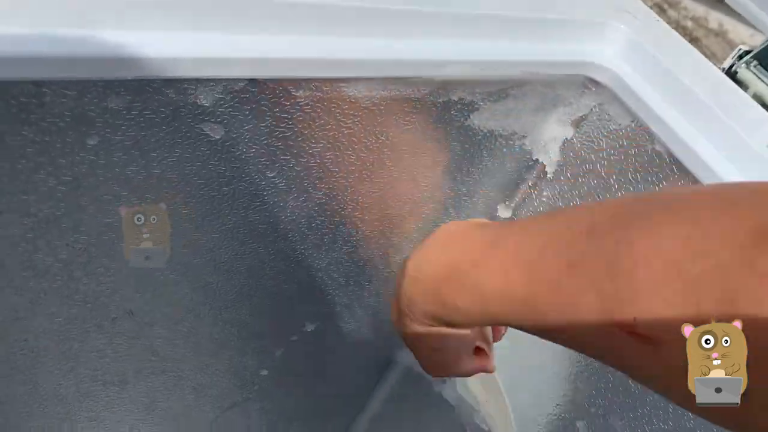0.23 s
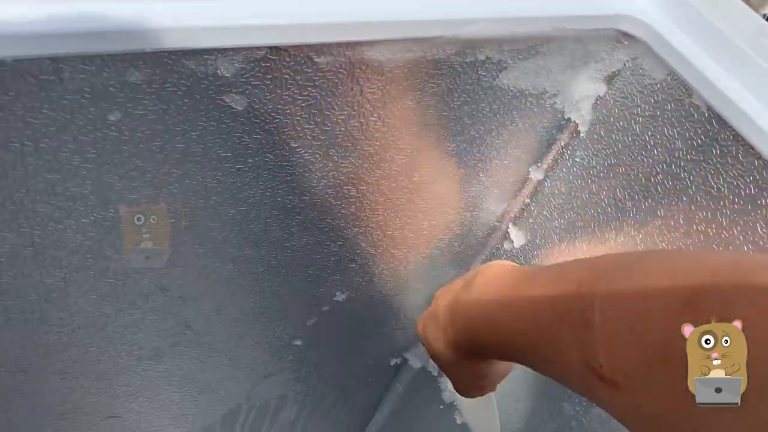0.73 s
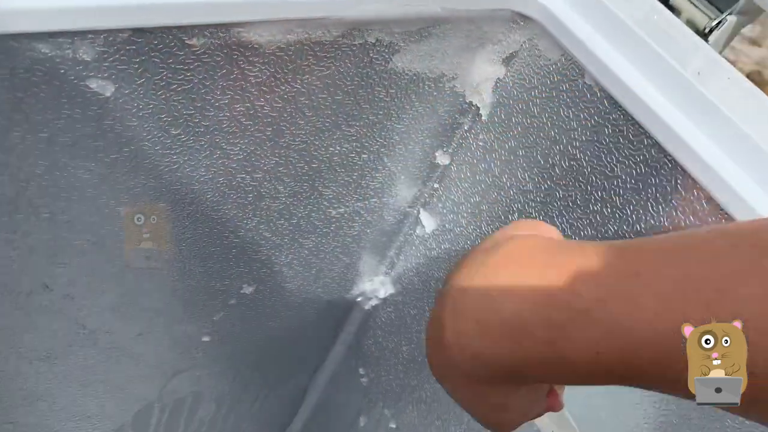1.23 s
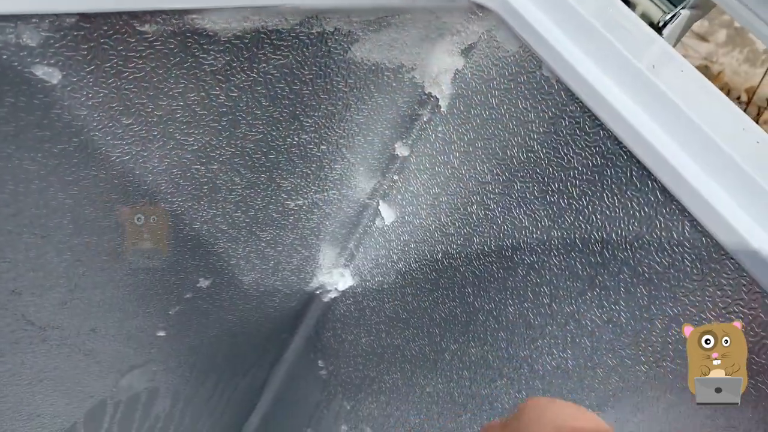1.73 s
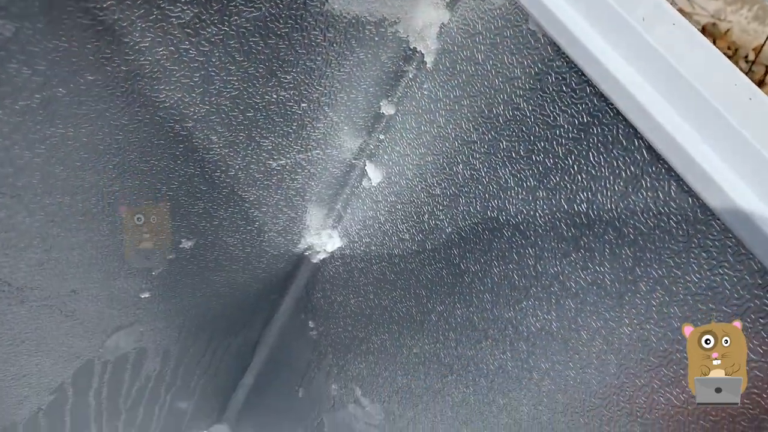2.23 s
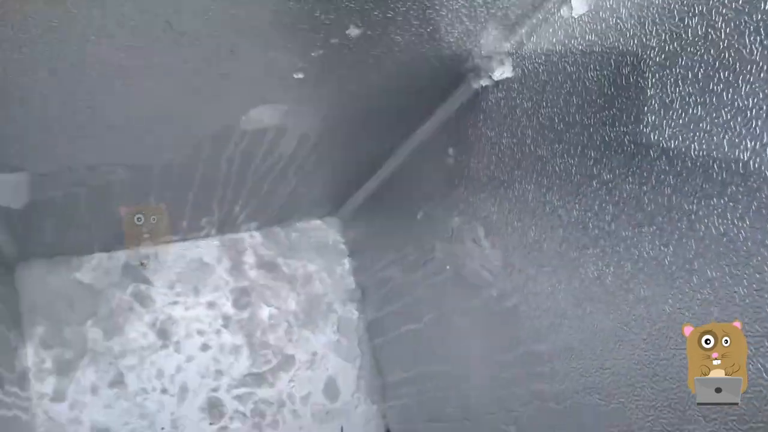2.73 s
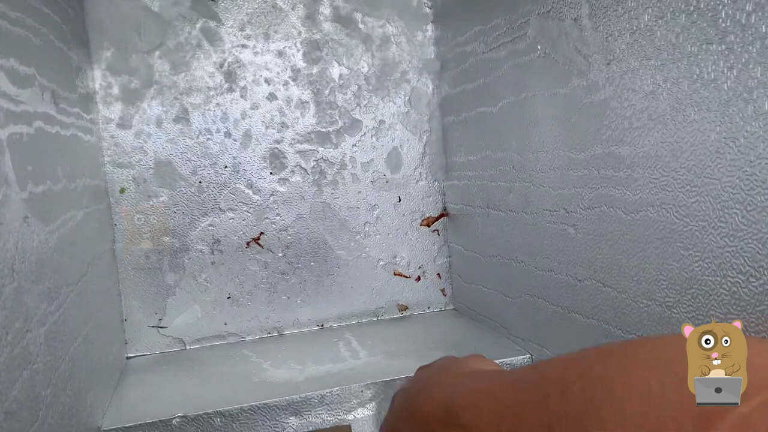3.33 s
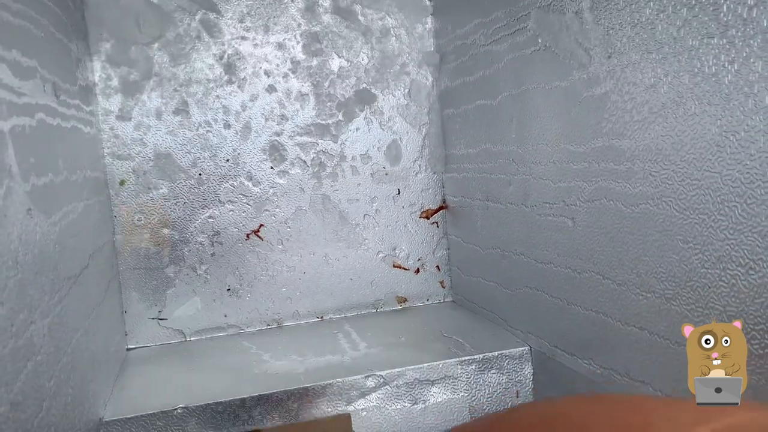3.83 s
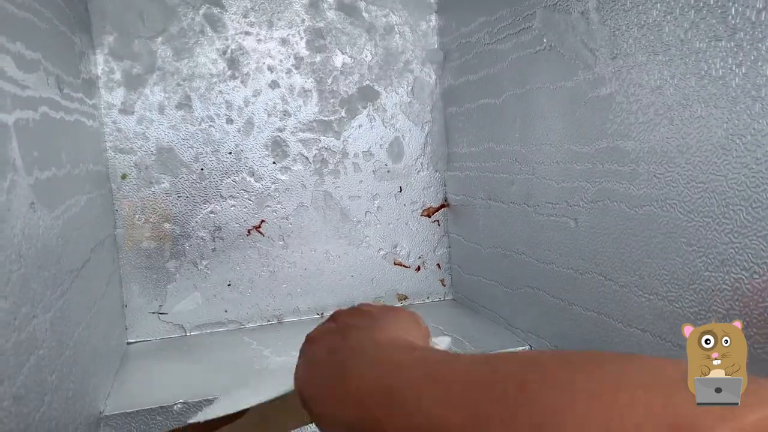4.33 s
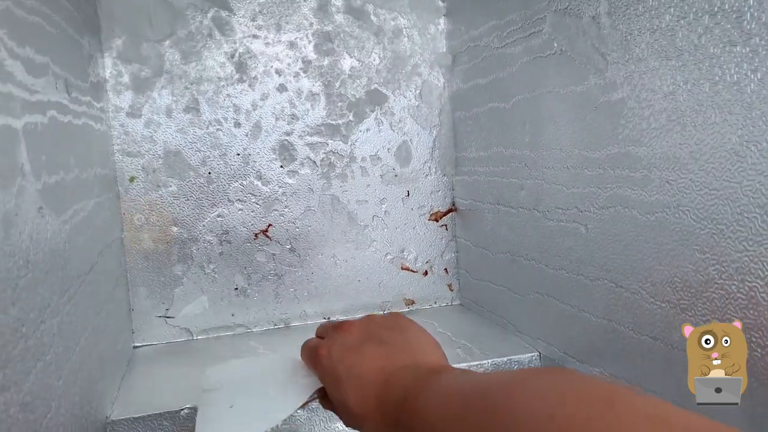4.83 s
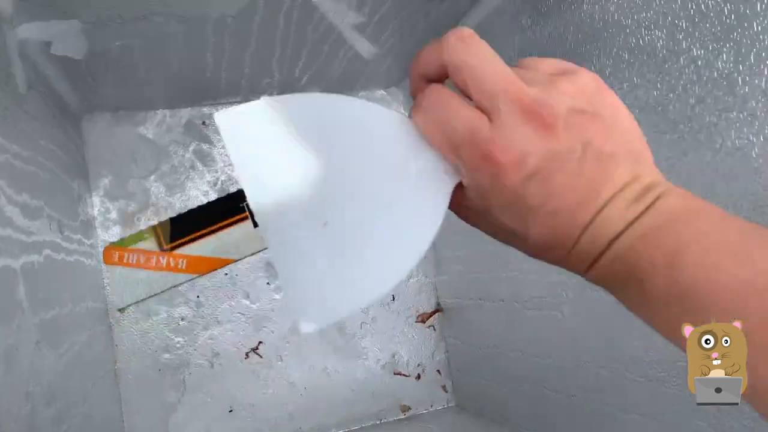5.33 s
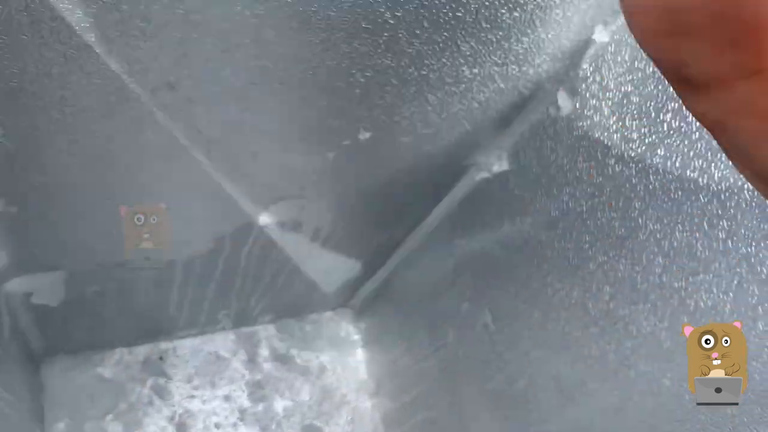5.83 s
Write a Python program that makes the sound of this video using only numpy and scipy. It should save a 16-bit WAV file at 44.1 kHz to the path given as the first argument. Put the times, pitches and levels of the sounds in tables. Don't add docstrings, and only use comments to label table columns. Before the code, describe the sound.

Plastic scraper rasps frost off a metal freezer wall in short crunchy strokes, then knocks and scrapes deeper down, over a low hollow drone.

```python
import sys
import numpy as np
from scipy import signal
from scipy.fft import rfft, irfft, next_fast_len
from scipy.io import wavfile
from scipy.ndimage import uniform_filter1d

SR = 44100
rng = np.random.default_rng(int(sys.argv[2]) if len(sys.argv) > 2 else 0)


def log_audio(samples):
    frames = np.atleast_2d(samples).T
    limited = np.clip(frames, -1, 1)
    pcm = np.round(limited * 32767).astype(np.int16)
    wavfile.write(sys.argv[1], SR, pcm)


def natural_amplitude(level_db):
    exponent = np.asarray(level_db, float) / 20
    return 10 ** exponent


N = 268701

# t/s, length/s, blade level at contact/dB, blade level at lift/dB, liner re blade/dB
WALL_STROKES = [(0.0, .008, -33, -35, -6), (0.045, .075, -35, -33, -10), (0.176, .15, -21.5, -21, -2),
                (0.37, .16, -35.5, -30, -5), (0.552, .1, -26, -24, -7), (0.66, .115, -21, -16.5, -5),
                (0.82, .13, -41, -48, -19), (0.965, .07, -33, -52, -8), (1.135, .155, -37, -20, -6),
                (1.29, .125, -18, -27, -8), (1.54, .1, -46, -53, 0), (1.908, .1, -24, -18, -6),
                (2.276, .015, -36, -39, -9)]
WALL_LIFT_DB_S = 470


def rms_one(x):
    return x / np.sqrt(np.mean(x ** 2) + 1e-20)


def in_time(rows):
    s, *columns = np.transpose(rows)
    return [np.interp(np.arange(N) / SR, s, c) for c in columns]


def at_hz(points, hz):
    point_hz, level_db = np.array(points).T
    return np.interp(np.log(hz), np.log(point_hz), level_db)


def band(lo_hz, hi_hz, x):
    return signal.sosfilt(signal.butter(2, [lo_hz, hi_hz], "band", fs=SR, output="sos"), x)


def colour(x, spectrum):
    size = next_fast_len(N)
    hz = np.maximum(np.fft.rfftfreq(size, 1 / SR), 1)
    octaves_below = np.maximum(np.log2(spectrum[0][0] / hz), 0)
    octaves_above = np.maximum(np.log2(hz / spectrum[-1][0]), 0)
    gain_db = at_hz(spectrum, hz) - 91 * (octaves_below + octaves_above)
    return rms_one(irfft(rfft(x, size) * natural_amplitude(gain_db), size)[..., :N])


def stereo(make):
    # f/Hz, correlation/1
    likeness = [(60, 0.82), (300, 0.87), (700, 0.21), (1500, 0.39), (5000, 0.19), (8000, 0)]
    size = next_fast_len(N)
    hz = np.maximum(np.fft.rfftfreq(size, 1 / SR), 1)
    alike = np.clip(at_hz(likeness, hz), 0, .97)
    mid = rfft(make(), size) * np.sqrt(1 + alike)
    side = rfft(make(), size) * np.sqrt(1 - alike)
    return rms_one(irfft(np.array([mid + side, mid - side]), size)[:, :N])


def drift(rate):
    r = np.exp(-80 * np.pi * rate / SR)
    slow = signal.lfilter([1], [1, -2 * r, r * r], rng.standard_normal(N // 40 + 2002))[2000:]
    return np.interp(np.arange(N) / 40, np.arange(len(slow)), rms_one(slow))


def patchy(x, patchy_db, rate):
    edges_hz = 2300 * 2 ** np.arange(0, 2.7, .38)
    out = x
    for lo_hz, hi_hz in zip(edges_hz, edges_hz[1:]):
        out = out + (natural_amplitude(patchy_db * drift(rate)) - 1) * band(lo_hz, hi_hz, x)
    return rms_one(out)


def resonate(x, peaks, patchy_db, rate):
    out = 0
    for k, (hz, width_hz, level_db) in enumerate(peaks):
        r = np.exp(-np.pi * width_hz / SR)
        fed = x * natural_amplitude(level_db + patchy_db * drift(rate))
        poles = [1, -2 * r * np.cos(2 * np.pi * hz / SR), r * r]
        ringing = signal.lfilter([1 - r * r, 0, r * r - 1], poles, fed) / np.sqrt(1 - r)
        out = out + (-1) ** k * ringing
    return rms_one(out)


def crystals(per_s, spread_db):
    sizes = natural_amplitude(spread_db * np.minimum(rng.exponential(1, N), 4)) * rng.choice([-1, 1], N)
    return sizes * (rng.random(N) < per_s / SR)


def pressure(rows, lift_db_s, frost_db):
    land_db_s, arch_db = 1800, 4
    firm_db = -25
    liner_follows, frost_follows = .6, .84
    out, lead = np.zeros((3, N + 2 * SR)), SR // 40
    for s, length, contact_db, lift_db, liner_db in rows:
        t = np.arange(-lead, round((length + .2) * SR)) / SR
        way = np.clip(t / length, 0, 1)
        push_db = contact_db + (lift_db - contact_db) * way + arch_db * np.sin(np.pi * way)
        away_db = land_db_s * np.maximum(-t, 0) + lift_db_s * np.maximum(t - length, 0)
        swing_db = push_db - away_db - firm_db
        liner_swing_db = liner_db + liner_follows * swing_db
        frost_swing_db = frost_db + frost_follows * swing_db
        gate = np.clip(np.minimum((t - t[0]) / .01, (t[-1] - t) / .05), 0, 1)
        gains = gate * natural_amplitude(firm_db + np.array([swing_db, liner_swing_db, frost_swing_db]))
        i = round(s * SR)
        out[:, i:i + len(t)] = np.maximum(out[:, i:i + len(t)], gains)
    return out[:, lead:N + lead]


def strokes():
    # t/s, length/s, blade level at contact/dB, blade level at lift/dB, liner re blade/dB
    bottom_strokes = [
        (3.053, .018, -25, -27, 3),
        (3.2, .06, -54, -34, 2),
        (3.26, .07, -32, -29, 5),
        (3.335, .095, -29, -16, 2),
        (3.835, .11, -38, -33, 4),
        (3.99, .025, -47, -49, -6),
    ]
    shuffles = [
        (3.622, .17, -34, -66, -1),
        (4.29, .04, -56, -38, -9),
        (4.335, .13, -42, -58, -12),
        (4.6, .07, -48, -50, -7),
        (4.685, .05, -43, -49, 10),
        (4.75, .06, -50, -41, 3),
        (4.82, .06, -49, -55, -7),
    ]
    # f/Hz, width/Hz, level/dB
    wall_rings = [(1619, 73, -1), (1754, 44, 2.5), (1913, 170, 3.5), (2153, 64, 6), (2296, 110, -2),
                  (2444, 68, 5), (3306, 98, -27.5), (4040, 67, -18.5)]
    # f/Hz, width/Hz, level/dB
    bottom_rings = [(1130, 63, 9.5), (1393, 40, -5), (1537, 95, 1), (2020, 120, -8), (2590, 45, 0.5),
                    (3290, 56, -14)]
    # f/Hz, width/Hz, level/dB
    liner_rings = [(328, 35, 2), (557, 77, 7.5), (1130, 104, -5.5)]
    # f/Hz, level per Hz/dB
    blade_colour = [(590, -46.5), (1000, -10), (1110, -36), (1270, -9.5), (1950, -0.5), (2510, -4),
                    (6000, -15), (7800, -32), (13200, -120)]
    # f/Hz, level per Hz/dB
    frost_colour = [(3000, 4), (4500, -2.5), (6400, 1.5), (8500, 4), (11000, 2.5), (14200, 2.5),
                    (15000, -25)]
    # t/s, level/dB
    hardness = [(0, 0), (0.2, -1), (0.3, 2), (0.55, 1), (0.62, -2), (0.75, 0), (1.0, 0), (1.17, -4),
                (1.27, 0), (1.35, 2), (1.43, 0), (1.92, -3), (2.02, -1), (3.26, 2), (3.31, -4), (3.4, 2),
                (3.45, -1), (4.9, 0)]
    bottom_lift_db_s = 800
    wall = pressure(WALL_STROKES, WALL_LIFT_DB_S, frost_db=-2)
    bottom = pressure(bottom_strokes, bottom_lift_db_s, frost_db=-5)
    shuffle = pressure(shuffles, bottom_lift_db_s, frost_db=0.5)
    _, every_liner, every_frost = wall + bottom + shuffle

    fine = natural_amplitude(2.0 * drift(45)) * stereo(lambda: crystals(per_s=4000, spread_db=1.5))
    coarse = stereo(lambda: crystals(per_s=600, spread_db=3.5))
    hard_db, = in_time(hardness)
    rasp = patchy(colour(fine + 0.5 * coarse, blade_colour), patchy_db=3.5, rate=12.5)
    rasp = natural_amplitude(.5 * hard_db) * rasp
    wall_ring = resonate(coarse + 0.61 * fine, wall_rings, patchy_db=4.5, rate=18.5)
    wall_blade = rms_one(0.48 * wall_ring + 0.38 * rasp)
    bottom_ring = resonate(coarse + 1.8 * fine, bottom_rings, patchy_db=6.5, rate=29)
    bottom_blade = rms_one(0.49 * bottom_ring + 0.51 * rasp)
    liner = resonate(coarse + fine, liner_rings, patchy_db=1.75, rate=47)
    frost = patchy(colour(fine + 0.3 * coarse, frost_colour), patchy_db=2.5, rate=15.5)

    out = natural_amplitude(-1.5) * wall[0] * wall_blade + bottom[0] * bottom_blade
    out = out + natural_amplitude(-4.5) * shuffle[0] * rasp
    return out + natural_amplitude(-1.5) * every_liner * liner + every_frost * natural_amplitude(hard_db) * frost


def knocks():
    # t/s, peak level/dB, ring f/Hz, tick level/dB
    dry_knocks = [(0.1264, -19, 2040, -17), (0.5895, -10.5, 2180, -20), (0.9398, -25, 2510, -22),
                  (0.9745, -8.5, 2260, -13.5), (1.0903, -31, 2260, -35), (1.6012, -27, 2370, -21),
                  (1.6586, -19, 3820, -24.5), (1.722, -31, 2400, -27), (1.913, -1.5, 2100, -22),
                  (2.2774, -9.5, 2654, -15), (3.3289, -5, 1030, -11), (3.6218, -2.5, 1832, -3.5),
                  (3.6967, -16, 1037, -25), (3.7407, -47, 930, -32), (3.908, -10.5, 1440, -19.5),
                  (4.3244, -15, 3600, -23.5), (4.607, -21, 3070, -23), (4.667, -30, 3000, -34),
                  (4.6775, -21, 2156, -26), (4.697, -24, 2000, -36), (3.3027, -22, 1900, -30),
                  (3.3965, -17, 1070, -18), (3.402, -16, 3200, -14), (3.43, -17, 2600, -17),
                  (1.692, -38, 3000, -32), (4.797, -26, 1420, -30)]
    catches = [(0.178, -11, 1905, -33), (0.9169, -26, 2850, -52), (1.1206, -30, 2610, -17.5),
               (1.257, -12, 1864, -30), (1.3443, -10, 1874, -26), (1.3889, -14, 1795, -30.5),
               (1.5404, -9, 2200, -10.5), (3.049, -16, 2434, -24.5), (3.071, -13.5, 1130, -23),
               (3.2074, -33, 1080, -34), (3.257, -10, 1130, -17.5), (3.382, -12, 1080, -26),
               (3.4224, -14, 2590, -20.5), (3.8312, -10, 950, -33), (3.8398, -9, 1025, -42.5),
               (3.8769, -19, 1036, -24)]
    knock_ring_db, catch_ring_db = -5, 7
    out, t = np.zeros((2, N + SR)), np.arange(SR // 7) / SR
    fade = lambda t60: natural_amplitude(-60 * t / t60)
    bite = 1 - np.exp(-t / .0016)
    rows = [(*row, knock_ring_db) for row in dry_knocks] + [(*row, catch_ring_db) for row in catches]
    for s, peak_db, ring_hz, tick_db, ring_db in rows:
        luck = rng.standard_normal((2, 1))
        dull, bright = rng.standard_normal((2, 2, len(t)))
        ring = (fade(0.02) + 0.21 * fade(0.087)) * np.sin(2 * np.pi * ring_hz * t + 0.56 * luck)
        splinter = band(1000, 4100, dull) * (fade(0.034) + 0.18 * fade(0.085))
        crack = natural_amplitude(ring_db) * ring + 1.56 * splinter
        tick = band(5800, 16500, bright) * (fade(0.027) + 0.16 * fade(0.17))
        i = round(s * SR)
        out[:, i:i + len(t)] += bite * (natural_amplitude(peak_db - 3) * crack + natural_amplitude(tick_db + 4.0) * tick)
    return out[:, :N]


def songs():
    # middle t/s, length/s, peak level/dB, f/Hz
    blade_songs = [(0.215, .05, -16, 1880), (0.24, .05, -18, 2150), (0.305, .025, -18, 2000),
                   (0.47, .04, -30, 1950), (0.515, .04, -30, 2400), (0.565, .03, -22, 2420),
                   (0.61, .04, -25, 3250), (0.685, .05, -17, 2000), (0.712, .025, -13, 2050),
                   (0.75, .025, -18, 2000), (0.768, .025, -13, 1850), (1.19, .04, -26, 2400),
                   (1.23, .04, -24, 2150), (1.272, .025, -20, 1600), (1.33, .04, -17, 1850),
                   (1.945, .025, -22, 1700), (1.975, .04, -14, 1870), (2.0, .015, -20, 2600),
                   (2.03, .03, -30, 1800), (3.4, .02, -18, 3200), (3.41, .025, -19, 1750),
                   (3.43, .04, -15, 2600), (3.435, .025, -20, 3300), (3.432, .02, -18, 1700),
                   (4.35, .04, -37, 3100), (4.385, .04, -40, 3350), (4.8, .03, -38, 950),
                   (4.805, .02, -40, 1300)]
    liner_songs = [(0.186, .025, -14, 550), (0.215, .02, -17, 500), (0.31, .02, -27, 250),
                   (0.325, .04, -16, 600), (0.595, .04, -21, 550), (0.738, .016, -13, 430),
                   (0.785, .05, -18, 570), (1.25, .05, -22, 320), (1.295, .04, -18, 570),
                   (1.31, .022, -13, 330), (1.335, .018, -27, 900), (1.45, .02, -30, 500),
                   (1.92, .015, -17, 380), (0.4, .05, -32, 1100), (0.3, .05, -24, 1100),
                   (4.77, .03, -30, 200), (4.615, .025, -30, 280), (1.975, .025, -22, 450),
                   (2.005, .018, -16, 480), (2.017, .012, -20, 480), (3.33, .04, -21, 560),
                   (3.4, .04, -15, 600), (4.683, .02, -24, 350), (4.81, .04, -33, 600),
                   (4.427, .022, -22, 270), (4.454, .022, -21, 250), (4.548, .022, -28, 270),
                   (4.583, .022, -28, 260)]
    flutter, detune = .55, .07
    spread_rad = .5
    out = np.zeros((2, N + SR))
    for s, length, peak_db, hz in blade_songs + liner_songs:
        luck = rng.standard_normal((3, 5, 1))
        t = np.arange(round(1.4 * length * SR)) / SR
        swell = np.sin(np.pi * (t / t[-1]) ** .8) ** 2
        ears = spread_rad * luck[2] * np.array([1, -1])[:, None, None]
        main = np.sin(2 * np.pi * hz * t + ears[:, 0])
        beside_hz = hz * (1 + detune * luck[0])
        beside = np.sin(2 * np.pi * beside_hz * t + 3 * luck[1] + 2 * ears).sum(axis=1)
        i = round((s - .6 * length) * SR)
        out[:, i:i + len(t)] += natural_amplitude(peak_db - 6.5) * swell * (main + flutter * beside)
    return out[:, :N]


def thuds():
    # t/s, panel level/dB, panel f/Hz, liner f/Hz, liner level/dB
    blows = [(0.177, -30, 306, 540, -15), (0.273, -16, 241, 686, -16), (0.554, -21, 224, 622, -22.5),
             (0.79, -34, 300, 545, -18), (1.544, -15.5, 229.3, 600, -13.5), (1.922, -14.5, 135, 690, -25),
             (2.285, -28, 220, 647, -31), (2.518, -40, 235, 485, -36.5), (3.078, -16, 322, 474, -17),
             (3.256, -27, 257, 560, -15), (3.35, -30, 210, 560, -16), (3.385, -30, 200, 600, -15),
             (3.627, -5.5, 219.3, 582, -15.5), (3.699, -8.5, 328, 513, -9), (3.831, -30, 420, 600, -10.5),
             (3.909, -31, 304, 557, -20), (4.323, -26, 233.6, 746, -37), (4.698, -17.5, 251, 519, -19.5)]
    # t/s, panel level/dB, panel f/Hz
    bumps = [(0.05, -17, 132), (1.125, -22.5, 310), (1.158, -21, 134), (1.185, -23, 290), (1.235, -22, 320),
             (1.599, -31, 224), (5.0, -30, 270), (5.36, -30, 290), (5.41, -25, 250), (5.49, -28, 280),
             (5.61, -25, 275), (1.935, -20, 285)]
    bump_liner_hz, bump_liner_db = 600, -22
    out, t = np.zeros((2, N + SR)), np.arange(SR // 6) / SR
    sag = t + 0.16 * 0.008 * (1 - np.exp(-t / 0.0065))
    ratios, levels_db = np.array([[.72], [1], [1.3], [1.65]]), np.array([[-6], [0], [-6], [-11]])
    soft = [(s, db, hz, bump_liner_hz, db + bump_liner_db) for s, db, hz in bumps]
    for s, peak_db, panel_hz, liner_hz, liner_db in blows + soft:
        luck = rng.standard_normal((3, 4, 1))
        panel = (1 - np.exp(-t / 0.0024)) * natural_amplitude(-60 * t / 0.13) * np.sin(2 * np.pi * panel_hz * sag)
        ears = []
        for own in luck[1:]:
            fades = natural_amplitude(levels_db + 0.6 * own - 60 * t / 0.069)
            modes = np.sin(2 * np.pi * liner_hz * ratios * sag + luck[0] + .5 * own)
            ears.append(np.sum(fades * modes, axis=0))
        liner = (1 - np.exp(-t / 0.001)) * np.array(ears)
        i = round(s * SR)
        out[:, i:i + len(t)] += natural_amplitude(peak_db + 1.5) * panel + natural_amplitude(liner_db) * liner
    return out[:, :N]


def chest(x):
    t60_s, low_hz, high_hz = 0.06, 250, 4900
    t = np.arange(SR // 4) / SR
    tail = rng.standard_normal((2, len(t))) * natural_amplitude(-60 * t / t60_s) * (t > .002)
    tail = signal.sosfilt(signal.butter(1, [low_hz, high_hz], "band", fs=SR, output="sos"), tail)
    tail = tail / np.sqrt(np.sum(tail ** 2, axis=1, keepdims=True))
    return signal.fftconvolve(x, tail, axes=1)[:, :N]


def drone():
    # t/s, level/dB, time to rise 20 dB/s, time to fall 20 dB/s, mode f/Hz
    puffs = [(0.0, -21, .05, .06, 102), (0.05, -16.5, .03, .075, 97.5), (0.27, -26, .6, .035, 96),
             (0.39, -32, .065, 1.3, 97), (1.17, -26, .14, .07, 89.5), (1.29, -36, .3, .03, 88),
             (1.58, -45, .3, .4, 95.5), (1.95, -21, .2, .13, 92.5), (2.49, -28, .8, .13, 95),
             (2.66, -29.5, .25, .18, 96), (3.02, -22.5, .15, .6, 92), (3.2, -20, .6, .3, 94.5),
             (3.61, -27.5, .17, .5, 92.5), (4.2, -21.5, .22, .8, 92.5), (4.76, -23.5, .19, .17, 95),
             (4.88, -27, .08, .14, 93.5), (5.08, -22, .05, .6, 93), (5.29, -18.5, .5, .25, 91.7),
             (5.57, -27, .8, .04, 90), (5.68, -26.5, .04, .6, 99), (6.0, -24.5, .09, .4, 95)]
    s, peak_db, rise, fall, puff_hz = np.transpose(puffs)
    t = np.arange(0, N / SR + .002, .002)[:, None]
    away = np.where(t < s, (s - t) / rise, (t - s) / fall)
    shape_db = np.max(peak_db - 20 * away, axis=1)
    hz, level_db = in_time(np.c_[t, np.interp(t, s, puff_hz), shape_db])
    phase = 2 * np.pi * np.cumsum(hz) / SR + 0.091 * drift(5.7)
    ears = np.sin(phase + [[0], [.2]]) * natural_amplitude([[-.3], [.3]])
    return np.sqrt(2) * natural_amplitude(level_db + .8 * drift(4)) * ears


def brush():
    # t/s, level/dB
    passes = [
        [(2.5, -69), (2.535, -45), (2.575, -38), (2.6, -44), (2.628, -34.5), (2.67, -93)],
        [(1.45, -70), (1.48, -54), (1.52, -66)],
        [(2.76, -54), (2.778, -62), (2.82, -56), (2.88, -75)],
    ]
    # f/Hz, level per Hz/dB
    cloth_colour = [(3820, -61), (6500, -26), (7000, -25), (7220, -78), (7320, -50), (7800, -3), (8330, 10),
                    (15000, -30)]
    gain, t = np.zeros(N), np.arange(N) / SR
    for rows in passes:
        level_db, = in_time(rows)
        since_start, to_end = t - rows[0][0], rows[-1][0] - t
        gain += np.clip(np.minimum(since_start + .004, to_end) / .004, 0, 1) * natural_amplitude(level_db)
    hiss = colour(rng.standard_normal((2, N)), cloth_colour) * natural_amplitude([[-9], [5]])
    crackle = rms_one(band(330, 1300, crystals(per_s=500, spread_db=3.5)))
    return gain * (hiss + natural_amplitude(-11.5) * crackle)


def breeze():
    # t/s, level/dB
    gusts = [(0.0, -22.5), (0.27, -32.5), (0.36, -43), (0.68, -39), (0.8, -44.5), (1.29, -43), (1.37, -60),
             (1.44, -58), (1.71, -42.5), (2.56, -41), (2.76, -33.5), (3.2, -42), (3.66, -47), (3.8, -42),
             (4.45, -39), (4.9, -43), (5.6, -33.5), (5.94, -41), (6.09, -23.5)]
    # f/Hz, level per Hz/dB
    rumble_colour = [(12, -56), (20, -18.5), (43, -3), (65, 8.5), (87, -1.5), (115, -8), (146, -9.5),
                     (170, -11.5), (220, -63), (370, -120)]
    # f/Hz, level per Hz/dB
    rustle_colour = [(65, -42.5), (110, -5.5), (124, -22), (188, -17), (267, -12.5), (354, -22), (400, -30),
                     (619, -28), (668, -24), (840, -37), (1500, -47), (1950, -76.5), (3300, -120)]
    # t/s, level/dB
    hand = [(0, -35), (0.9, -46), (2.4, -48), (2.95, -38), (3.5, -54), (3.9, -41), (4.15, -49), (4.6, -38),
            (5.2, -43), (5.45, -37), (6.09, -41)]
    rumble = colour(stereo(lambda: rng.standard_normal(N)), rumble_colour)
    rustle = colour(stereo(lambda: crystals(per_s=900, spread_db=3)), rustle_colour)
    effort = pressure(WALL_STROKES, WALL_LIFT_DB_S, 0)[1]
    grip = natural_amplitude(in_time(hand)[0]) + natural_amplitude(-10.5) * effort
    return natural_amplitude(in_time(gusts)[0] + 2.0) * rumble + grip * natural_amplitude(2.1 * drift(7.7)) * rustle


def open_air(loud):
    # f/Hz, level per Hz/dB
    air_colour = [(480, 1), (900, 2.5), (1100, -8), (1500, -8), (4800, -5), (7000, -6.5), (8800, -17.5),
                  (11000, -21), (14000, -24.5), (14700, -34)]
    # t/s, level/dB
    air_level = [(0, -52), (2.2, -54), (2.8, -51), (3.15, -52), (4.15, -53), (4.95, -49), (5.4, -51.5),
                 (6.09, -48.5)]
    duck_from_db, duck_slope, recover_db_s = -32.5, 0.21, 38
    level_db = 10 * np.log10(uniform_filter1d(np.mean(loud ** 2, axis=0), 900) + 1e-9)
    ramp = recover_db_s * np.arange(N) / SR
    held_db = np.maximum.accumulate(level_db + ramp) - ramp
    duck_db = -duck_slope * np.maximum(held_db - duck_from_db, 0)
    gain = natural_amplitude(in_time(air_level)[0] + 1.0 + duck_db + .6 * drift(8))
    return gain * colour(rng.standard_normal((2, N)), air_colour)


def treble_turns(x):
    from_hz, in_step_hz, period_hz = 8600, 10250, 3180
    size = next_fast_len(N + 8192)
    hz = np.fft.rfftfreq(size, 1 / SR)
    onset = np.clip((hz - from_hz) / 1200, 0, 1)
    alike = 1.25 * onset * np.cos(2 * np.pi * (hz - in_step_hz) / period_hz)
    alike = np.clip(alike, -.999, .999)
    x = np.pad(x, ((0, 0), (0, size - N)), "linear_ramp", end_values=((0, 0), (0, 0)))
    x = np.roll(x, 1024, axis=1)
    x[:, :1024] = x[:, 1024:1025] * np.linspace(0, 1, 1024)
    mid = rfft(x[0] + x[1], size) * np.sqrt(1 + alike)
    side = rfft(x[0] - x[1], size) * np.sqrt(1 - alike)
    return irfft(np.array([mid + side, mid - side]) / 2, size)[:, 1024:N + 1024]


def scene():
    hits = knocks() + thuds() + songs()
    scraping = natural_amplitude(-1.7) * strokes()
    echo = natural_amplitude(-12) * chest(hits + 0.92 * scraping)
    work = scraping + hits + echo
    return work + drone() + brush() + breeze() + open_air(work)


def roll_off(x):
    return signal.sosfilt(signal.butter(12, 16480, fs=SR, output="sos"), x)


def record(dry):
    top_cut = signal.ellip(10, .3, 45, 16000, fs=SR, output="sos")
    cut = signal.sosfilt(top_cut, treble_turns(dry))
    cut = cut * np.clip((N - np.arange(N)) / 200, 0, 1)
    return roll_off(1.087 * np.tanh(cut / 1.006))


dry = scene()
out = record(dry)
log_audio(out)
```